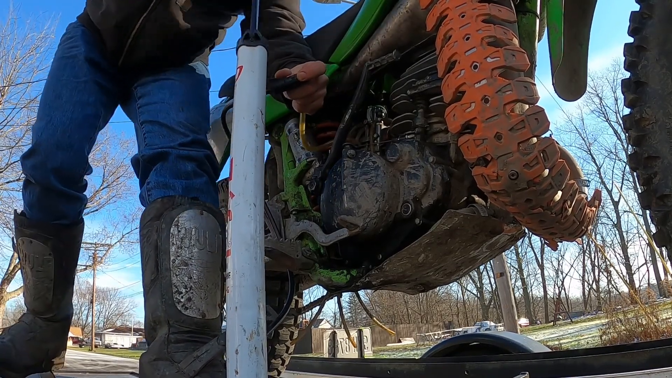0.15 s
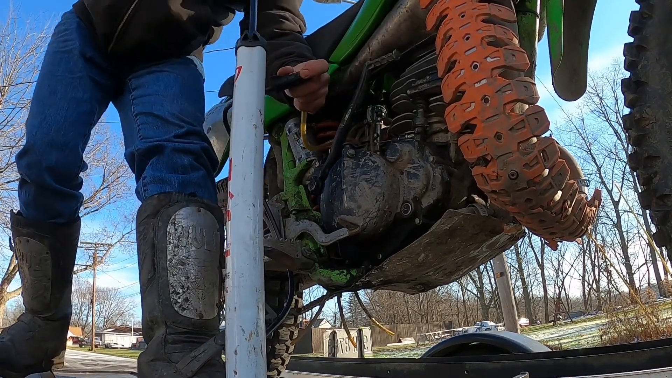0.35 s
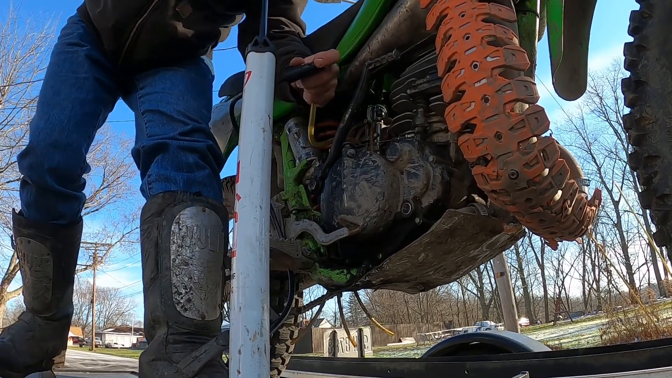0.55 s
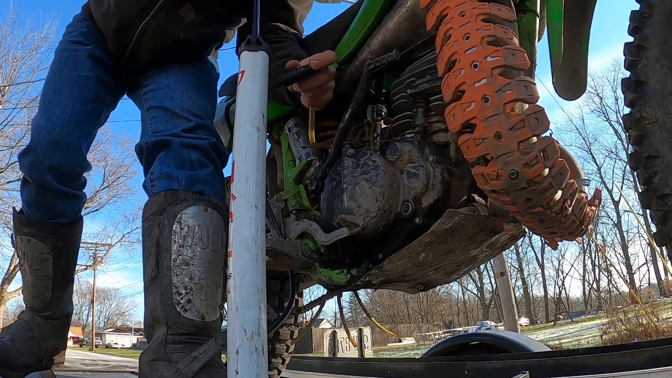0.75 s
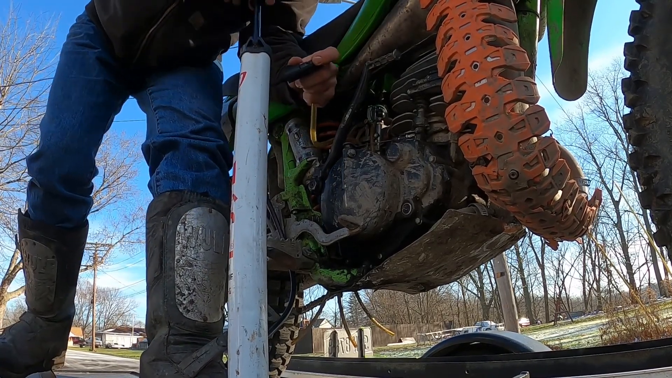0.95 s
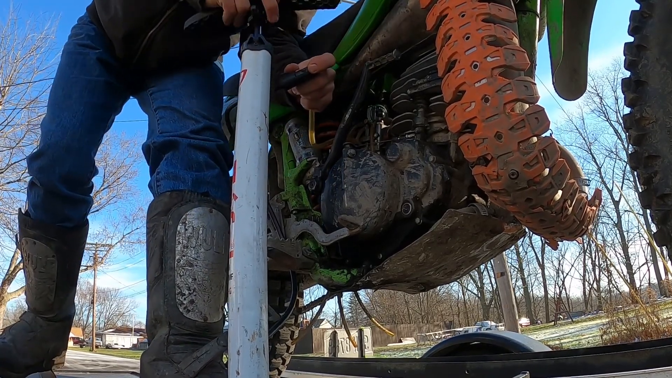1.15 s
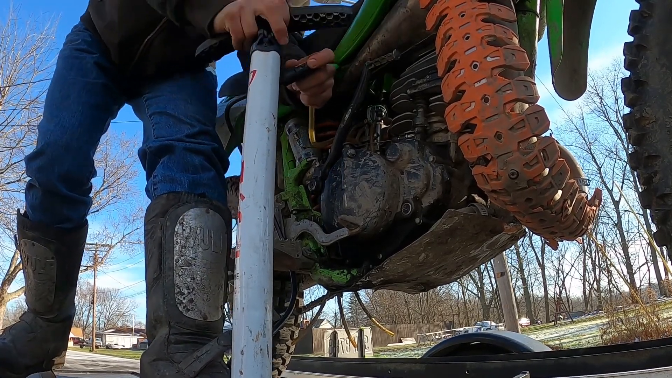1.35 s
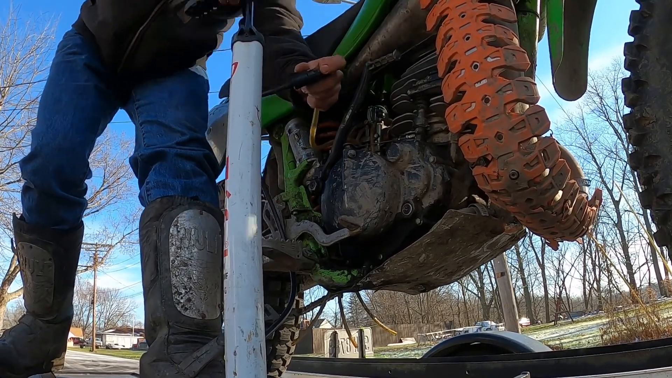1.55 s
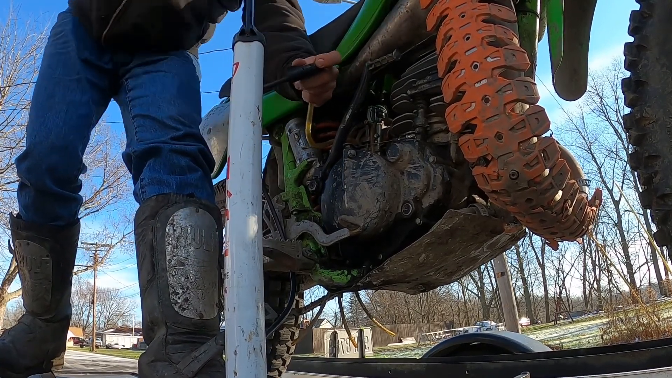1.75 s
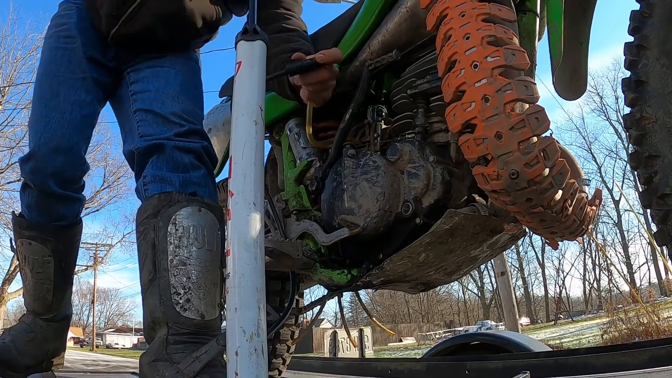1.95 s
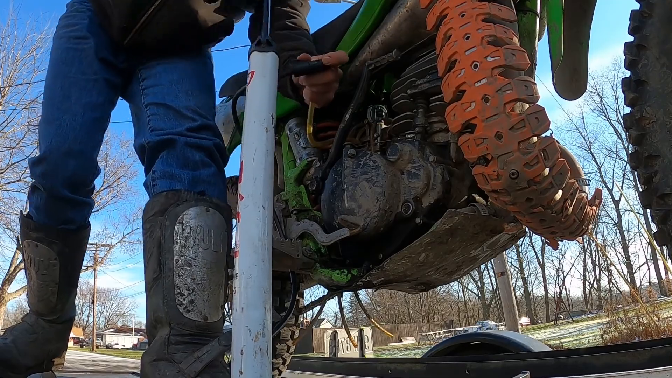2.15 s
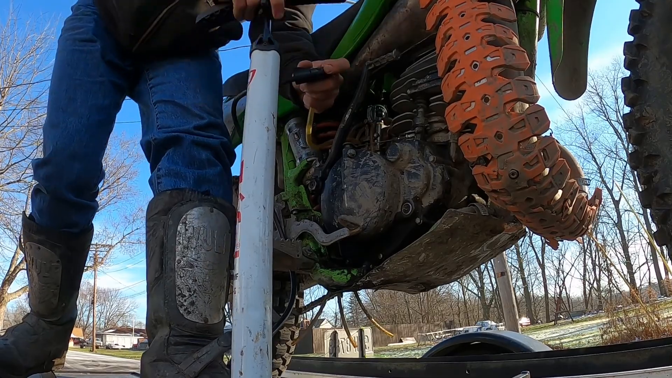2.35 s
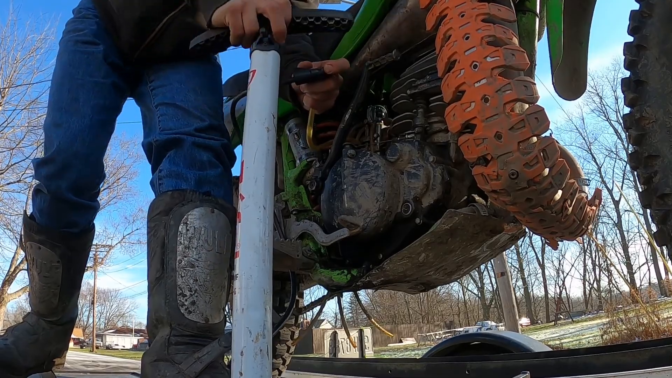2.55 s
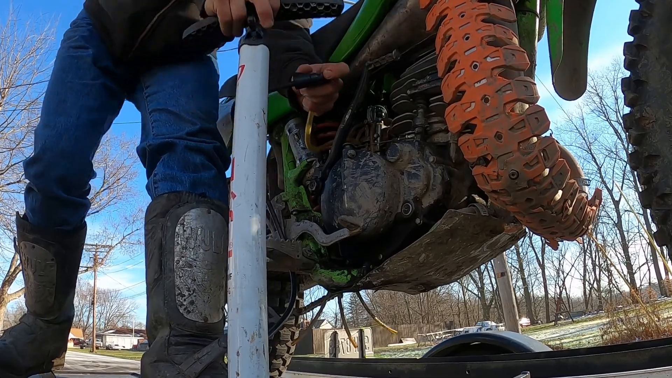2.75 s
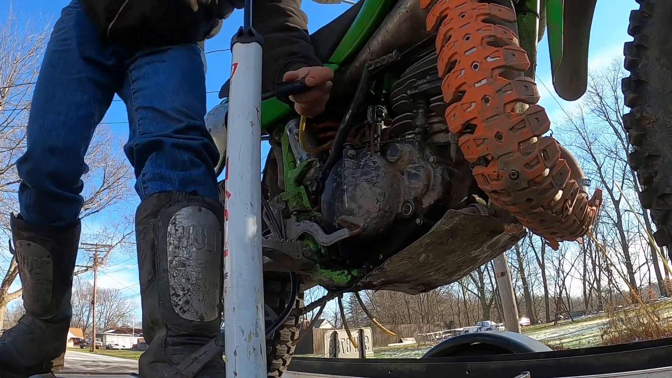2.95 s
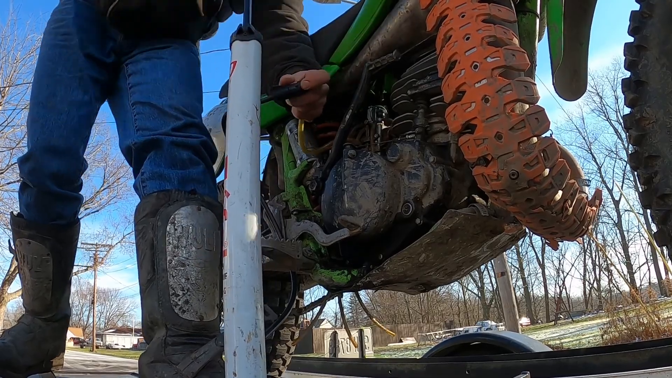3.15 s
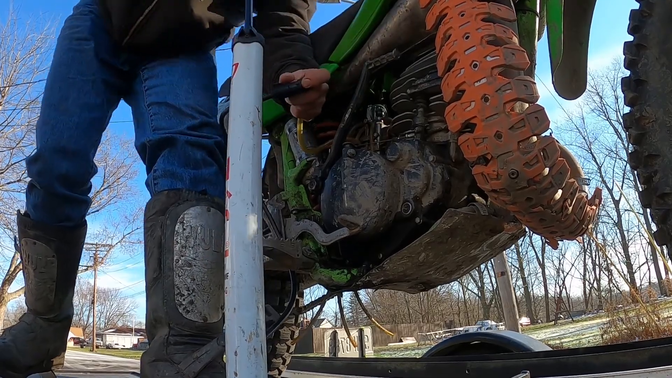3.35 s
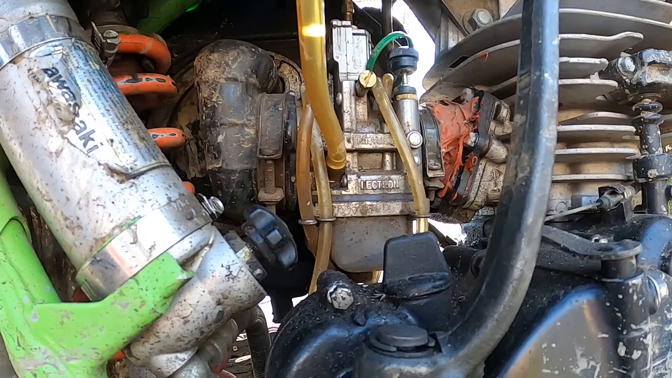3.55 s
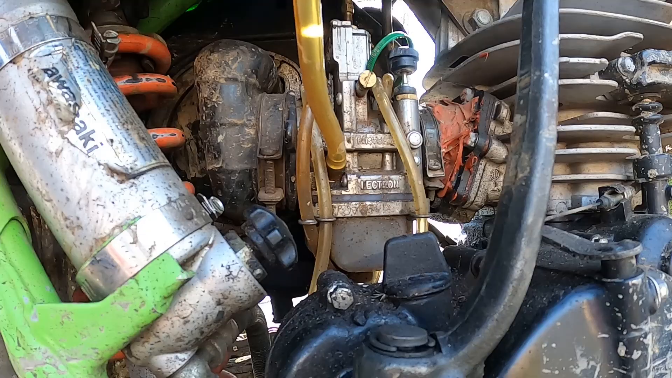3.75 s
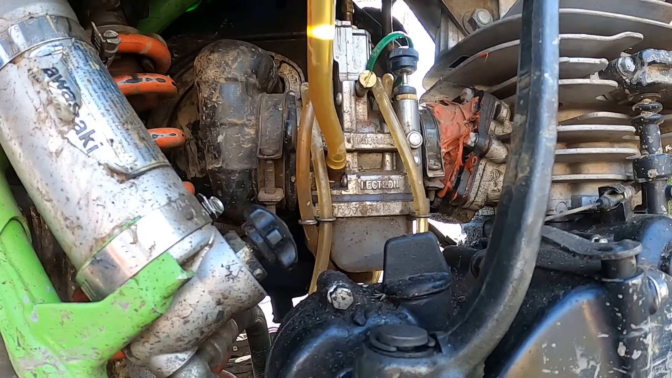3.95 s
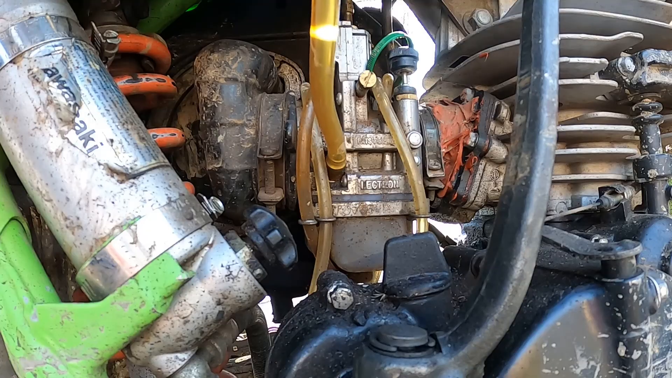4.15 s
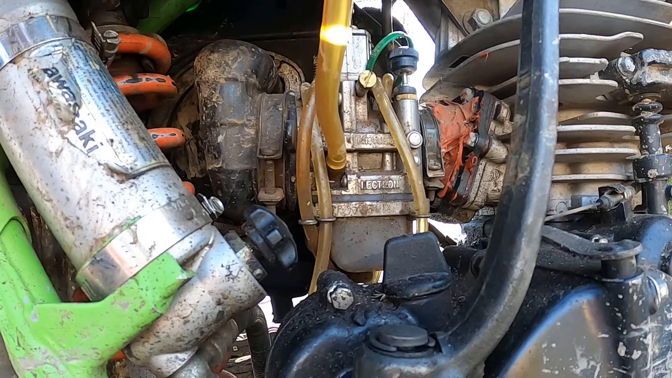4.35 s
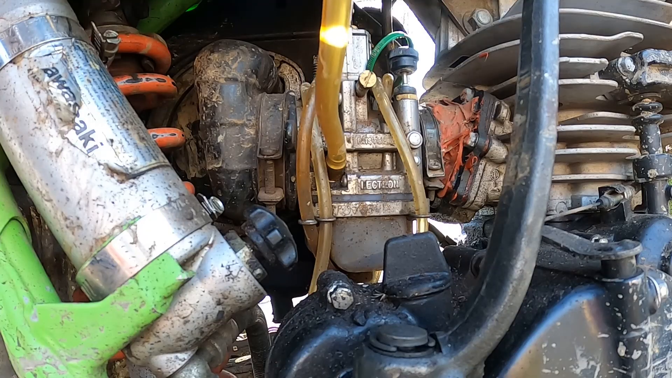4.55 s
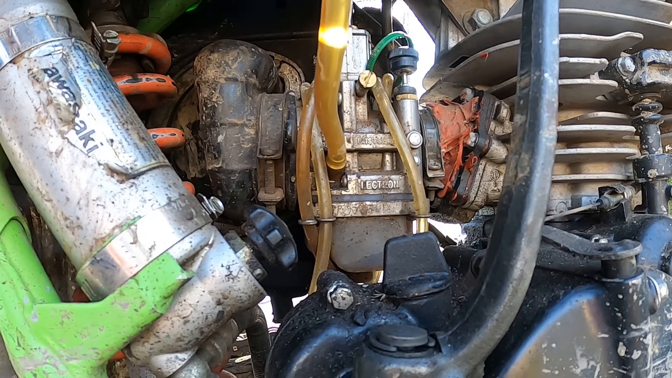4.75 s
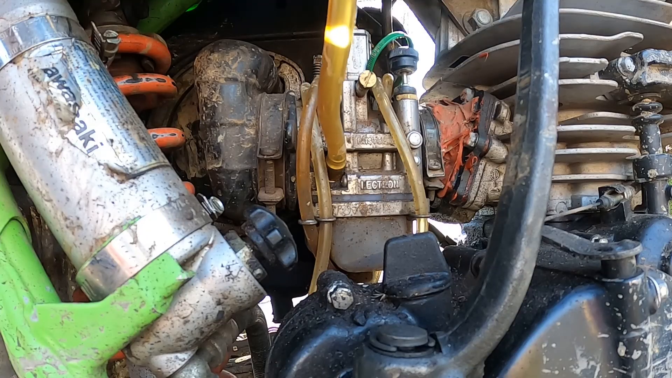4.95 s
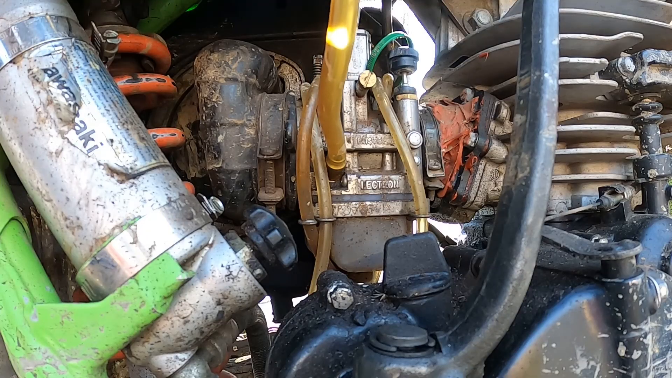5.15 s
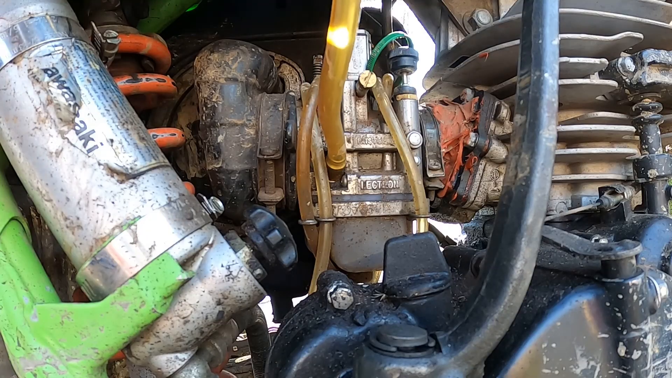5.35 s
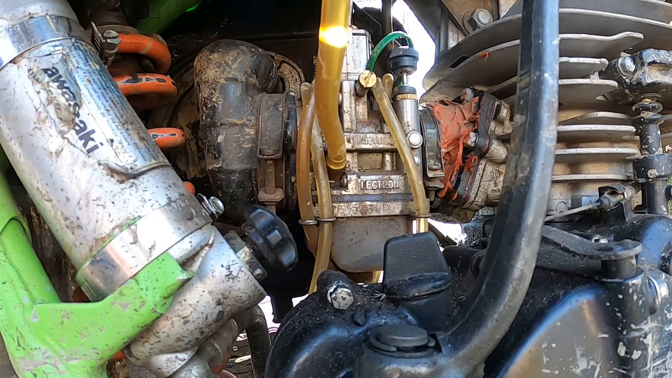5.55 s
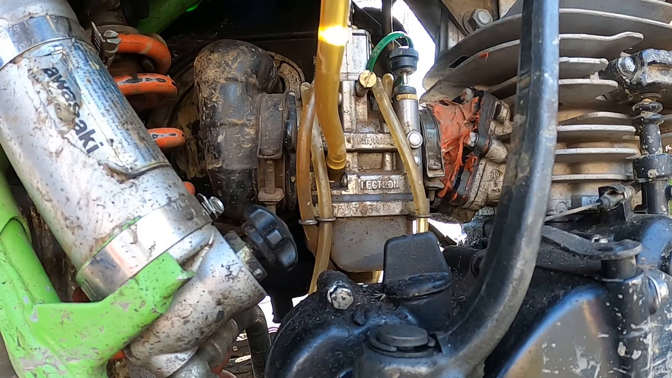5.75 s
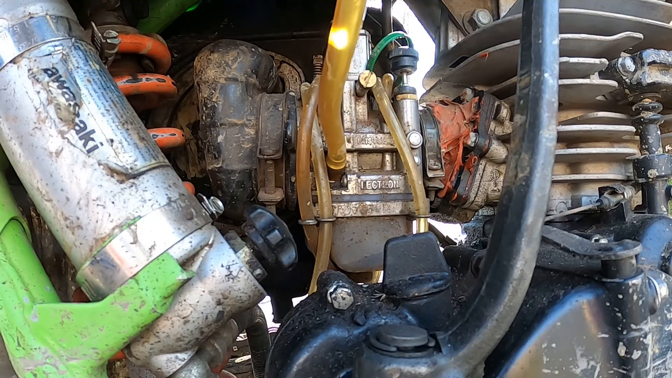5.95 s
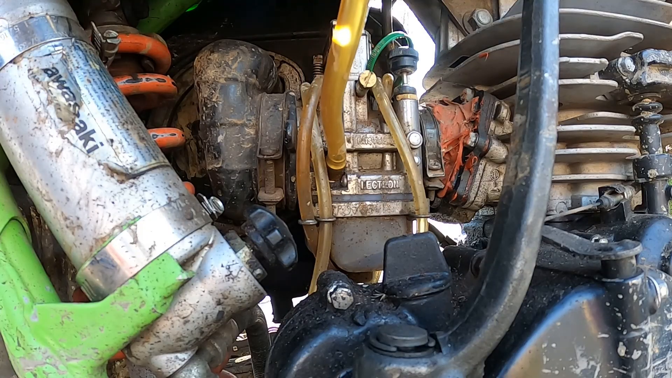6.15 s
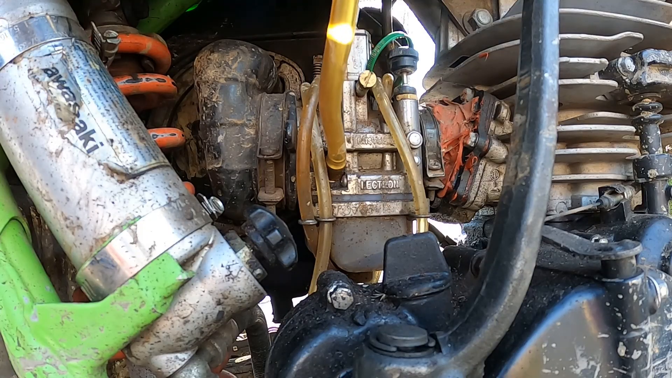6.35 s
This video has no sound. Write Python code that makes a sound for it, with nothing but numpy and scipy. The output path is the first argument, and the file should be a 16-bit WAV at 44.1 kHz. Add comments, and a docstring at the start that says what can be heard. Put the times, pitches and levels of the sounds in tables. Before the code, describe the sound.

Quick, uneven pump strokes knock, hiss and squeak close by over distant traffic rumble and wind, before a cut to quiet rustling fabric and ticks.

```python
"""Gusts of wind, stronger on the left, and the knocks of a floor pump come first, over a far traffic rumble.
The pump's air rushes on each stroke, its seal rubs and squeaks, its handle knocks and shakes base and barrel.
After a brief silence a second scene has only the rumble, rustling cloth and a few small ticks.
Air is shaped noise, rubbing and cloth are showers of tiny clicks, knocks are noise bursts and ringing tones."""
import sys
import numpy as np
from scipy import signal
from scipy.fft import rfft, irfft
from scipy.io import wavfile
from scipy.ndimage import uniform_filter1d

SR = 44100
rng = np.random.default_rng(int(sys.argv[2]) if len(sys.argv) > 2 else 0)


def bounce(signal):
    """Save signal as a 16-bit WAV file at the path given by the first command-line argument."""
    frames = np.transpose(np.atleast_2d(signal))
    limited = np.clip(frames, -1, 1)
    pcm = np.round(limited * 32767).astype(np.int16)
    wavfile.write(sys.argv[1], SR, pcm)


N = 286650   # length in samples


def from_db(db):
    """Turn a level in dB into a gain."""
    return 10 ** (np.asarray(db) / 20)


def rms_one(x):
    """Scale to unit rms, the average strength."""
    return x / np.sqrt(np.mean(x ** 2) + 1e-20)


def peak_one(x):
    """Scale to unit peak."""
    return x / np.abs(x).max()


def in_time(rows):
    """Read each column of a curve table at every sample, with rounded corners."""
    seconds, *columns = np.transpose(rows)
    t = np.arange(N) / SR
    return [uniform_filter1d(np.interp(t, seconds, column), size=200) for column in columns]


def at_hz(points, hz):
    """Read a spectrum table on a log-frequency axis."""
    points = np.array(points)
    return np.interp(np.log(hz), np.log(points[:, 0]), points[:, 1])


def drift(rate):
    """Slow random wavering of spread 1; a higher rate (Hz) wavers faster."""
    step = 40   # samples between the slow values
    r = np.exp(-2 * np.pi * rate * step / SR)
    white = rng.standard_normal(N // step + 2002)
    slow = signal.lfilter([1], [1, -2 * r, r * r], white)[2000:]
    return np.interp(np.arange(N) / step, np.arange(len(slow)), rms_one(slow))


def band(x, low_hz, high_hz, order=2):
    """Keep the sound between two frequencies (Butterworth band-pass)."""
    edges = [low_hz, min(high_hz, .45 * SR)]
    return signal.sosfilt(signal.butter(order, edges, "band", fs=SR, output="sos"), x)


def coloured(x, spectrum):
    """Give a steady sound a spectrum; rms 1."""
    hz = np.maximum(np.arange(N // 2 + 1) * SR / N, 1)
    return rms_one(irfft(rfft(x) * from_db(at_hz(spectrum, hz)), N))


def ring(x, hz, t60):
    """Each unit click sets off a sine of height 1 that falls 60 dB in t60 seconds."""
    r = from_db(-60 / (t60 * SR))
    w = 2 * np.pi * hz / SR
    return signal.lfilter([0, np.sin(w)], [1, -2 * r * np.cos(w), r * r], x + 1e-18)


CLICK_HEIGHT = 6.6   # height of the click, against a noise of spread 1
ATTACK_S = .0006


def burst(t60):
    """Noise that swells up within about a millisecond and dies away, with one sharp click near its start."""
    t = np.arange(12000) / SR
    click = CLICK_HEIGHT * (np.arange(len(t)) == 30)
    decay = from_db(-60 * t / max(t60, .004))
    return click + rng.standard_normal(len(t)) * decay * (1 - np.exp(-t / ATTACK_S))


def add(out, s, x):
    """Mix a short sound in at a time in seconds."""
    at = round(s * SR)
    out[at:at + len(x)] += x


def wide(source, side_db):
    """A near source: left and right differ by a slightly late, duller copy of it."""
    late = np.concatenate([np.zeros(97), source[:-97]])
    side = from_db(side_db) * band(late, 40, 5000, order=1)
    return np.array([source + side, source - side])


def grains(per_s, spread_db):
    """Dense random clicks of uneven size, up or down."""
    sizes = from_db(spread_db * np.minimum(rng.exponential(1, N), 5))
    signs = rng.choice([-1, 1], N)
    return sizes * signs * (rng.random(N) < per_s / SR)


def hiss(spectrum, pipes, pipes_db):
    """Turbulent noise, lifted at resonances; rms 1."""
    noise = coloured(rng.standard_normal(N), spectrum)
    white = rng.standard_normal(N)
    lifted = 0
    for hz, width, db in pipes:
        once = ring(white, hz, 1.7 / width)
        lifted = lifted + from_db(db) * rms_one(ring(once, hz, 1.7 / width))
    return rms_one(noise + from_db(pipes_db) * rms_one(lifted))


def humps(start, length, start_db, end_db, rise, fall):
    """Level in dB of the loudest of many events: straight rise, sloping hold, straight fall (dB per s)."""
    step = 44   # samples between the computed levels
    t = np.arange(0, N + step, step) / SR - np.reshape(start, (-1, 1))
    as_rows = (np.maximum(length, 1e-4), start_db, end_db, rise)
    length, start_db, end_db, rise = [np.reshape(v, (-1, 1)) for v in as_rows]
    db = start_db + (end_db - start_db) * np.clip(t / length, 0, 1)
    db = db + rise * np.minimum(t, 0) - fall * np.maximum(t - length, 0)
    loudest = np.interp(np.arange(N) / step, np.arange(db.shape[1]), db.max(axis=0))
    return uniform_filter1d(loudest, size=200)


# Colour of the far rumble. Each row: frequency in Hz, relative level in dB.
TRAFFIC_COLOUR = [(12, -37), (20, -5.5), (64, 2), (123, -2.5), (164, -11), (230, -11), (332, -30.5),
                  (477, -38.5), (588, -31), (669, -30.5), (803, -34.5), (1100, -35), (3440, -69),
                  (5500, -55), (8800, -68), (10500, -88), (13000, -100), (22000, -120)]
# How alike left and right are. Each row: frequency in Hz, likeness (1 is identical).
TRAFFIC_LIKENESS = [(25, .8), (60, 0.96), (200, 1), (500, 0.27), (1500, 0.15), (4000, 0.4), (8000, .9)]
# Loudness of the rumble, a little higher in the second scene. Each row: time in seconds, level in dB.
TRAFFIC_LEVEL = [(3.57, -36.5), (3.6, -35)]


def traffic():
    """Far rumble in half-octave bands of noise, each wavering on its own."""
    out = 0
    edges = 20 * 2 ** np.arange(0, 9.1, .5)
    white = rng.standard_normal((2, 2, N))
    for k, (low, high) in enumerate(zip(edges, edges[1:])):
        mid, side = band(white[k % 2], low, high)
        hz = np.sqrt(low * high)
        alike = np.clip(at_hz(TRAFFIC_LIKENESS, hz), -1, 1)
        gain = from_db(at_hz(TRAFFIC_COLOUR, hz) + 1.0 * drift(2.3))
        out = out + gain * (np.sqrt(1 + alike) * mid + np.sqrt(1 - alike) * side * [[1], [-1]])
    return from_db(in_time(TRAFFIC_LEVEL)[0]) * rms_one(out)


# Strength of the gusts. Each row: time in seconds, relative level in dB.
GUSTS = [(0, -27), (.06, -34.5), (.4, -45), (.52, -30), (.575, -19), (.61, -26), (.64, -34), (.68, -25.5),
         (.74, -39.5), (.86, -35.5), (.97, -36), (1.08, -29.5), (1.16, -42.5), (1.4, -39.5), (1.58, -44.5),
         (2.03, -35.5), (2.37, -32.5), (2.46, -28), (2.6, -45.5), (2.8, -59)]


def wind():
    """Lumpy low noise, stronger on the left and partly opposed on the right; strong gusts flutter higher."""
    gust_db = in_time(GUSTS)[0]
    white = rng.standard_normal((2, N))
    lumps = rms_one(band(white, 18, 100)) * from_db(gust_db + 7.5)
    # the flutter grows faster than the gust
    flutter = rms_one(band(white[::-1], 81, 260)) * from_db(1.636 * gust_db - 0.5)
    wavering = from_db(0.71 * np.array([drift(3.5), drift(6)]))
    left, other = (lumps + flutter) * wavering
    return np.array([from_db(1.5) * left, from_db(-5.5) * other - 0.45 * left])


# Movements of cloth. Each row: loudest moment in seconds, relative level in dB, swell in seconds per 20 dB
# (anything below 0.04, also negative, swells in 0.04).
CLOTH_MOVES = [(3.619, -62.5, 5.5), (3.669, -62.5, -1.5), (3.74, -67.5, 1), (3.88, -60.5, -0.53),
               (3.93, -62, 0.33), (3.99, -52.5, 0.13), (4.075, -61, -1.2), (4.16, -57.5, 0.2),
               (4.31, -69, 0.1), (4.51, -74, 2.5), (4.605, -59.5, 0.07), (4.785, -58, -0.25),
               (4.874, -57.5, -0.37), (4.921, -66, 0.5), (5.03, -63.5, 0.12), (5.072, -62.5, -0.25),
               (5.283, -61.5, -0.3), (5.343, -53.5, -0.36), (5.446, -58.5, 0.15), (5.75, -69, -0.5),
               (5.845, -71.5, 0.7), (6.042, -67.5, -1.8), (6.078, -68.5, -1.1), (6.118, -65.5, -1.9),
               (6.19, -74, 1), (6.392, -69.5, -1)]
# Colour of the crackle. Each row: frequency in Hz, relative level in dB.
CLOTH_COLOUR = [(1000, -17), (1800, -1), (2550, -6.5), (3270, -6), (5130, -1.5), (6250, -4), (8500, -4),
                (12100, -19.5), (13800, -20)]
RUSTLE_FALL_DB_PER_S, RUSTLE_REST_DB = 393, -83
BRIGHTEN_SHARE, BRIGHT_FROM_HZ = .5, 7800   # the top of the crackle grows faster than its level


def cloth():
    """Fine crackle of fabric, swelling and brightening with each movement, dying quickly."""
    s, db, swell_s = np.transpose(CLOTH_MOVES)
    rise = 20 / np.maximum(swell_s, .04)
    level_db = np.maximum(humps(s, 0, db, db, rise, RUSTLE_FALL_DB_PER_S), RUSTLE_REST_DB)
    crackle = coloured(grains(8200, spread_db=2.5), CLOTH_COLOUR)
    low = signal.sosfiltfilt(signal.butter(3, BRIGHT_FROM_HZ, fs=SR, output="sos"), crackle)
    top = crackle - low
    top_db = BRIGHTEN_SHARE * (level_db - level_db.max())
    return from_db(level_db + 0.92 * drift(30)) * (low + from_db(top_db) * top)


# Small near ticks. Each row: time in seconds, relative peak in dB, treble in dB, body in dB,
# decay time (60 dB) in seconds.
SMALL_TICKS = [(3.7374, -54, -12, -4, 0.021), (3.8268, -39.5, -20, 0, .024), (4.166, -37, 3, -15.5, .012),
               (4.7795, -47, -13, 0, 0.022), (4.862, -50, -7, -5, 0.015), (4.8709, -21.5, -7.5, -1.5, 0.02),
               (5.0619, -43, 4.5, -6.5, 0.028), (5.2844, -46.5, -8.5, -10, 0.028),
               (5.4644, -40.5, -20, 12, .035)]


def ticks():
    """Small dry ticks: a little body, a snap and a brighter part of one noise burst."""
    out = np.zeros(N)
    for s, db, treble_db, body_db, t60 in SMALL_TICKS:
        noise = burst(t60)
        body = from_db(body_db) * band(noise, 327, 1300)
        snap = band(noise, 1090, 2600)
        treble = from_db(treble_db) * band(noise, 3300, 5500)
        add(out, s, from_db(db + 0.5) * peak_one(body + snap + treble))
    return out


# The piston's strokes. Each row: start in seconds, length in seconds, relative air level in dB at start and
# at end, rub level in dB at start and at end, base shudder in dB.
PUMP_STROKES = [(0.221, 0.18, -46.5, -52.5, -34.5, -48.5, -48), (0.463, 0.068, -53, -51, -31, -44, -28.5),
                (1.482, 0.028, -59, -48, -58, -41, -36), (1.646, 0.22, -52, -51, -32.5, -40, -44),
                (1.974, 0.067, -51, -50, -33.5, -31, -24.5), (2.9, 0.23, -51.5, -50, -31.5, -40, -37),
                (3.19, 0.12, -54, -53, -24, -34.5, -29)]
# Air that leaks between strokes. Each row: time in seconds, relative level in dB.
AIR_LEAK = [(0, -53.5), (.1, -63), (.16, -52.5), (.6, -57.5), (.87, -59.5), (1.39, -58.5), (2.1, -55),
            (2.69, -53.5), (3.2, -70), (3.4, -59), (3.57, -61.5)]
# The flow stalls as the piston turns. Each row: start in seconds, length in seconds, highest level left in dB.
FLOW_STALLS = [(0.405, 0.018, -66), (1.542, 0.06, -69.5), (1.904, 0.013, -61.5), (2.756, 0.11, -64.5),
               (3.145, 0.061, -63)]
# Brief spurts of air. Each row: time in seconds, relative level in dB.
AIR_PUFFS = [(2.306, -48)]
AIR_RISE_DB_PER_S, AIR_FALL_DB_PER_S, STALL_EDGE_DB_PER_S = 299.5, 349.5, 502


def airflow():
    """Flow in dB: the leak, lifted by strokes and puffs, choked at the stalls."""
    start, length, first_db, last_db = np.transpose(PUMP_STROKES)[:4]
    strokes = humps(start, length, first_db, last_db, AIR_RISE_DB_PER_S, AIR_FALL_DB_PER_S)
    s, db = np.transpose(AIR_PUFFS)
    puffs = humps(s, 0, db, db, STALL_EDGE_DB_PER_S, AIR_FALL_DB_PER_S)
    s, lasting, db = np.transpose(FLOW_STALLS)
    ceiling = -humps(s, lasting, -db, -db, STALL_EDGE_DB_PER_S, STALL_EDGE_DB_PER_S)
    return np.minimum(np.max([in_time(AIR_LEAK)[0], strokes, puffs], axis=0), ceiling)


# Colour of the rush of a stroke. Each row: frequency in Hz, relative level in dB.
RUSH_COLOUR = [(880, -23), (1500, -11.5), (1830, -2), (2000, -14.5), (2280, -7), (2860, -8), (3780, -9.5),
               (4730, -2.5), (5450, -11), (7990, -11), (10800, -19.5), (12300, -16.5), (14000, -24)]
# Resonances of hose and valve. Each row: frequency in Hz, width setting in Hz, relative level in dB.
RUSH_PIPES = [(1970, 110, -2), (2206, 190, 5), (3640, 200, -3.5), (4406, 120, -3.5), (6430, 150, -17)]
# Colour of the faint seep. Each row: frequency in Hz, relative level in dB.
SEEP_COLOUR = [(880, -24), (1500, 1), (1590, -10.5), (1730, -3.5), (3480, -4.5), (5600, -8.5), (6150, -14),
               (8450, -11), (10900, -25.5), (12900, -20), (14000, -28.5)]
# Whistles in the seep. Each row: frequency in Hz, width setting in Hz, relative level in dB.
SEEP_TONES = [(1063, 30, 0), (1890, 94, -0.5), (3460, 150, 7.5), (6200, 200, 4)]
SEEP_DB = -54.5   # above this the flow is the rush of a stroke


def air():
    """Weak flow seeps with a faint whistle; what goes beyond it rushes through hose and valve."""
    flow = from_db(airflow())
    seep = np.minimum(flow, from_db(SEEP_DB))
    rush = np.sqrt(flow ** 2 - seep ** 2) * from_db(1.6 * drift(25))
    rush_sound = hiss(RUSH_COLOUR, RUSH_PIPES, pipes_db=-6)
    seep_sound = hiss(SEEP_COLOUR, SEEP_TONES, pipes_db=-8)
    return from_db(7.5) * rush * rush_sound + from_db(5.5) * seep * seep_sound


# Knocks of handle and piston. Each row: time in seconds, relative crack peak in dB, barrel ring in dB,
# base thud in dB, crack treble in dB, crack decay time (60 dB) in seconds, crack pitch in Hz, body pitch in Hz.
PUMP_KNOCKS = [(0.1182, -8.5, -26.5, -29, -26, 0.065, 1360, 620),
               (0.1415, -13, -26, -23.5, -4, 0.026, 2300, 570),
               (0.244, -19.5, -22.5, -27.5, -13, 0.021, 1260, 335),
               (0.417, -23.5, -26.5, -30, -17, 0.13, 1270, 310),
               (0.4367, -7.5, -13.5, -20, -38, 0.043, 1380, 764),
               (.451, -25, -23.5, -20.5, -23, 0.034, 1300, 730),
               (0.5425, -38, -20.5, -16, -20, .03, 1350, 226),
               (0.5635, -17.5, -62, -34, -29, 0.034, 1890, 700),
               (0.581, -51, -35, -36, -18, 0.026, 1440, 400),
               (1.474, -14, -27.5, -17, -17, 0.06, 1420, 735),
               (1.497, -15, -36, -23.5, -8.5, 0.037, 1850, 700),
               (1.617, -24.5, -42, -31, -22, 0.07, 1570, 370),
               (1.6247, -18, -34, -39, -30, 0.043, 2410, 400),
               (1.635, -17.5, -33, -33, -9, 0.036, 3470, 500),
               (1.6407, -10.5, -34, -28, -17, 0.043, 1780, 400),
               (1.6695, -11.5, -19.5, -36, -26, 0.05, 2200, 877),
               (1.6995, -18, -21.5, -23, -8, 0.044, 1910, 672), (1.894, -33, -27, -27, -25, .04, 1220, 626),
               (1.915, -24, -34.5, -23, -10, 0.075, 1300, 377),
               (2.05, -42, -30.5, -17, -17, .03, 1500, 797),
               (2.6975, -10.5, -14.5, -14, -20, 0.064, 1310, 698),
               (2.7494, -48, -30, -27.5, -17, .045, 1200, 600),
               (2.8335, -28.5, -54, -28, -11, 0.043, 1900, 340),
               (2.8697, -15.5, -40, -29.5, -25, 0.046, 2320, 390),
               (2.8861, -15.5, -27, -22, -11.5, 0.046, 2410, 603),
               (2.903, -16.5, -24, -30, -32, 0.056, 1600, 360),
               (2.9183, -8, -16.5, -33.5, -30, 0.051, 1810, 800),
               (2.9561, -18, -22, -30.5, -30, 0.043, 2230, 358.3),
               (3.111, -17, -25.5, -25.5, -5.5, 0.1, 2020, 660),
               (3.124, 6.5, -20.5, -9, -12.5, 0.026, 1950, 618),
               (3.1764, -1, -12, -6, -18, 0.081, 1370, 910), (3.196, -27, -27, -13, -24, 0.06, 2500, 780),
               (3.2696, -41, -38, -12.5, -8, .045, 1990, 320)]
RUB_RISE_DB_PER_S, RUB_FALL_DB_PER_S = 300, 107
SHUDDER_RISE_DB_PER_S, SHUDDER_FALL_DB_PER_S = 138, 191
REST_RUB_DB, REST_SHUDDER_DB = -54, -44.5   # between strokes
# after a knock the seal chatters below the barrel ring, the base shakes below the thud
CHATTER_DB, CHATTER_FALL_DB_PER_S = -18.5, 94
SHAKE_DB, SHAKE_FALL_DB_PER_S = -6, 129.5


def effort():
    """Levels in dB of rub and shudder: strokes drive both, knocks leave both dying away."""
    start, length, _, _, first_db, last_db, shudder_db = np.transpose(PUMP_STROKES)
    s, _, ring_db, thud_db = np.transpose(PUMP_KNOCKS)[:4]
    sudden = 3000   # dB per s
    stroke_rub = humps(start, length, first_db, last_db, RUB_RISE_DB_PER_S, RUB_FALL_DB_PER_S)
    chatter_db = ring_db + CHATTER_DB
    chatter = humps(s, 0, chatter_db, chatter_db, sudden, CHATTER_FALL_DB_PER_S)
    stroke_shudder = humps(start, length, shudder_db, shudder_db, SHUDDER_RISE_DB_PER_S, SHUDDER_FALL_DB_PER_S)
    shake_db = thud_db + SHAKE_DB
    shake = humps(s, 0, shake_db, shake_db, sudden, SHAKE_FALL_DB_PER_S)
    rub = np.maximum(stroke_rub, chatter)
    shudder = np.maximum(stroke_shudder, shake)
    return np.maximum(rub, REST_RUB_DB), np.maximum(shudder, REST_SHUDDER_DB)


# Tones of base, barrel and handle. Each row: frequency in Hz, relative level in dB,
# basic decay time (60 dB) in seconds.
PUMP_TONES = [(85.6, -1.5, 0.34), (170.4, 5.5, 0.089), (235, -0.5, 0.075), (258.6, -9.5, 0.14),
              (318.2, -12.5, 0.33), (371, -14.5, 0.41), (415.5, -5, 0.15), (549, -16, 0.32),
              (607, -6.5, 0.15), (678.7, -0.5, 0.11), (787, -4, 0.21), (872, -14, 0.081),
              (1019, -17.5, 0.89), (1303, -8.5, 0.11), (1400, -15.5, 0.071), (1706, -17, 0.22),
              (2200, -18, 0.059), (3910, -20, .16)]
BASE_TOP_HZ = 320   # tones up to here belong to the base, higher ones to the barrel
# Colour of the rubbing seal. Each row: frequency in Hz, relative level in dB.
RUB_COLOUR = [(150, -32), (250, -1), (352, -9.5), (398, -3), (469, -10.5), (815, -6), (1150, -18),
              (1240, -16), (1750, -13), (3500, -29), (4550, -59.5), (7700, -120)]
SNAGS_PER_S, SNAG_CYCLES, SNAG_DB = 370, 31, -9   # chance snags of the seal, against the even rub
SHAKE_TILT_DB_PER_OCTAVE = -1


def piston(rub_db, shudder_db):
    """The seal slips finely in the barrel and snags at chance pitches; shaking rings the low base tones."""
    slips = grains(3000, spread_db=0.0)
    barrel, base, snags = 0, 0, 0
    shake = band(rng.standard_normal(N), 41, 300)
    for hz, db, t60 in PUMP_TONES:
        if hz > BASE_TOP_HZ:
            barrel = barrel + from_db(db) * ring(slips, hz, min(t60, .12))
        else:
            tilt_db = SHAKE_TILT_DB_PER_OCTAVE * np.log2(hz / 100)
            base = base + from_db(db + tilt_db) * ring(shake, hz, 1.6 * t60)
    sparse = grains(SNAGS_PER_S, spread_db=3.5)
    dealt = rng.integers(0, 18, N)   # which of 18 pitches each snag gets
    for k, hz in enumerate(np.geomspace(330, 3000, num=18)):
        snags = snags + from_db(at_hz(RUB_COLOUR, hz)) * ring(sparse * (dealt == k), hz, SNAG_CYCLES / hz)
    even = coloured(slips, RUB_COLOUR) + from_db(-6.0) * rms_one(barrel)
    rub = rms_one(even + from_db(SNAG_DB) * rms_one(band(snags, 250, 3500)))
    judder = from_db(1.8 * drift(40))
    return from_db(rub_db) * judder * rub + from_db(shudder_db - 1.0) * rms_one(base)


# Moments when the seal catches and squeaks. Each row: start in seconds, length in seconds,
# level in dB, pitch in Hz.
SEAL_CATCHES = [(0.227, 0.018, -40, 2290), (0.235, 0.019, -38.5, 1280), (0.194, 0.016, -52, 630),
                (0.274, 0.014, -41.5, 990), (0.313, 0.087, -49, 2200), (.335, 0.029, -41.5, 1075),
                (0.473, 0.011, -47, 800), (.505, 0.016, -39, 690), (1.985, 0.034, -43, 2510),
                (1.975, 0.041, -45, 1780), (2.726, 0.03, -33, 607), (2.761, .05, -40, 780),
                (2.927, 0.071, -33, 369), (2.95, 0.023, -38, 2330), (2.96, .04, -37.5, 615),
                (3.098, 0.023, -43, 2080), (3.197, 0.037, -42, 1470), (3.202, 0.061, -35.5, 543)]
CATCH_SLIPS_PER_S, CATCH_CYCLES, CATCH_EDGE_DB_PER_S = 3600, 24, 701


def catches():
    """Each catch is a short run of uneven slips ringing at one pitch."""
    out, slips = 0, grains(CATCH_SLIPS_PER_S, spread_db=3.0)
    for s, length, db, hz in SEAL_CATCHES:
        squeak = rms_one(band(ring(slips, hz, CATCH_CYCLES / hz), hz / 1.2, hz * 1.2))
        level_db = humps(s, length, db, db, CATCH_EDGE_DB_PER_S, CATCH_EDGE_DB_PER_S)
        out = out + from_db(level_db) * squeak
    return out


# Scuffs of the handle in its guide. Each row: start in seconds, length in seconds, level in dB at start and
# at end, centre in Hz.
HANDLE_SCUFFS = [(0.733, .05, -33.5, -49.5, 680), (1.116, 0.047, -40.5, -53.5, 680),
                 (2.601, 0.069, -39, -49, 700), (3.107, 0.0059, -43, -25, 2300),
                 (3.109, 0.012, -35.5, -31, 6000)]
SCUFF_WIDTH = 1.267   # band edges as a ratio to the centre
SCUFF_RISE_DB_PER_S, SCUFF_FALL_DB_PER_S = 2001, 401


def scuffs():
    """Each scuff is a lumpy run of slips in a band around its centre."""
    out, slips = 0, grains(CATCH_SLIPS_PER_S, spread_db=2.0) * from_db(2.0 * drift(50))
    for s, length, first_db, last_db, hz in HANDLE_SCUFFS:
        level_db = humps(s, length, first_db, last_db, SCUFF_RISE_DB_PER_S, SCUFF_FALL_DB_PER_S)
        out = out + from_db(level_db) * rms_one(band(slips, hz / SCUFF_WIDTH, hz * SCUFF_WIDTH))
    return out


# Resonances of the handle stop. Each row: frequency in Hz, width in Hz, relative level in dB.
CRACK_BANDS = [(1742, 760, 3.5), (2286, 515, 0), (3260, 310, -1.5), (4320, 500, -6.5)]
# each knock favours its own crack and body pitch
FOCUS_DB, BODY_WIDTH_SHARE, BODY_LOSS_DB_PER_OCTAVE = 4.5, 0.39, 10.5
BODY_T60_S, TREBLE_T60_SHARE = 0.23, 0.94


def knocks():
    """Each knock is a short crack, a dull rattling body and a blow that rings base and barrel."""
    out, blows = np.zeros(N), np.zeros((len(PUMP_TONES), N))
    mode_hz, mode_db, mode_t60 = np.transpose(PUMP_TONES)
    in_base = mode_hz <= BASE_TOP_HZ
    for s, crack_db, ring_db, thud_db, bright_db, t60, crack_hz, body_hz in PUMP_KNOCKS:
        noise = burst(t60)
        crack = 0
        for hz, width, db in CRACK_BANDS + [(crack_hz, 0.21 * crack_hz, FOCUS_DB)]:
            crack = crack + from_db(db) * band(noise, hz - width / 2, hz + width / 2)
        treble = band(burst(TREBLE_T60_SHARE * t60), 4000, 7200)
        add(out, s, from_db(crack_db - 6.0) * peak_one(crack + from_db(bright_db) * treble))
        half_width = BODY_WIDTH_SHARE / 2
        body = band(burst(BODY_T60_S), body_hz * (1 - half_width), body_hz * (1 + half_width))
        add(out, s + .001, from_db(ring_db - 3.0) * peak_one(body))
        barrel_db = ring_db - 6.0 - BODY_LOSS_DB_PER_OCTAVE * np.abs(np.log2(mode_hz / body_hz))
        level_db = np.where(in_base, thud_db - 8.0, barrel_db) + mode_db
        level_db = level_db + rng.normal(0, 2.2, len(PUMP_TONES))
        # the base tones start together as one push, the barrel's with random signs
        signs = np.where(in_base, -1, rng.choice([-1, 1], len(PUMP_TONES)))
        blows[:, round((s + .003) * SR)] = from_db(level_db) * signs
    rings = np.array([ring(blow, hz, t60) for blow, hz, t60 in zip(blows, mode_hz, mode_t60)])
    # a padded contact has no sharp edge; loose parts roughen the barrel's ring
    base = band(rings[in_base].sum(axis=0), 74, 900)
    rattle = from_db(2.4 * drift(60))
    return out + base + rattle * band(rings[~in_base].sum(axis=0), 200, 3500)


# The silence between the two scenes: start in seconds, end in seconds.
GAP_S = (3.571, 3.585)


def scene():
    """First scene with pump and wind, a silent gap, second scene with cloth and ticks; traffic in both."""
    t = np.arange(N) / SR
    rub_db, shudder_db = effort()
    pump = wide(air() + piston(rub_db, shudder_db) + catches() + scuffs() + knocks(), side_db=-5.0)
    near = wide(cloth() + ticks(), side_db=-1.5)
    before = np.clip((GAP_S[0] - t) / 0.0013, 0, 1)
    after = np.clip((t - GAP_S[1]) / 0.002, 0, 1)
    return before * (pump + wind()) + after * near + (before + after) * traffic()


# The stereo image narrows to the middle and opens again with the second scene.
# Each row: time in seconds, gain of the left-right difference in dB.
STEREO_WIDTH = [(.45, -5.5), (.7, -6.5), (1.1, -16.5), (1.35, -22.5), (1.6, -38.5), (3.57, -39.5),
                (3.59, -4.5)]
CUTOFF_HZ = 14100


def record(dry):
    """The stereo width changes, the end fades out in 5 ms, peaks are rounded and the top is cut."""
    mid = (dry[0] + dry[1]) / 2
    side = (dry[0] - dry[1]) / 2 * from_db(in_time(STEREO_WIDTH)[0])
    fade = np.minimum(np.arange(N)[::-1] / 220, 1)
    x = fade * np.array([mid + side, mid - side])
    rounded = 1.284 * np.tanh(x / 1.465)
    return signal.sosfilt(signal.cheby2(16, 60, CUTOFF_HZ, fs=SR, output="sos"), rounded)


dry = scene()
out = record(dry)
bounce(out)
```